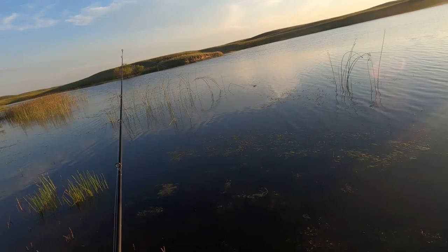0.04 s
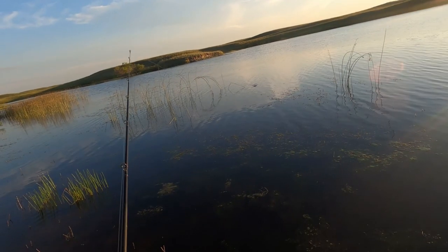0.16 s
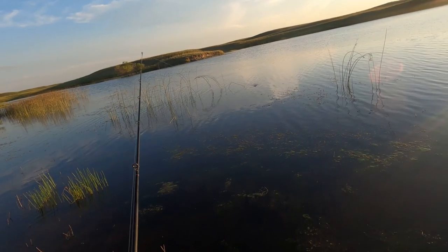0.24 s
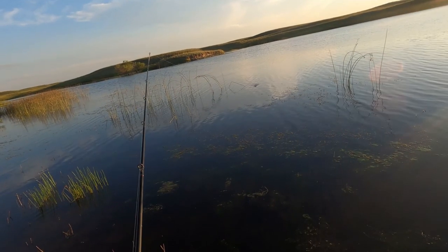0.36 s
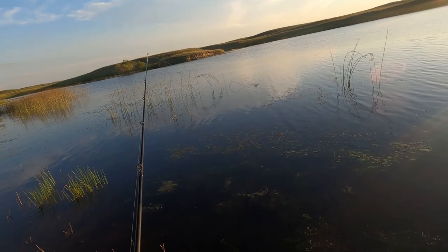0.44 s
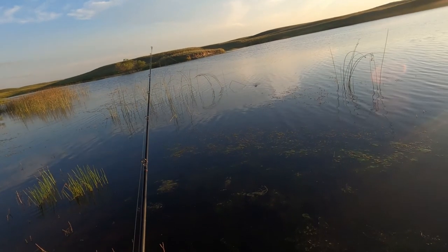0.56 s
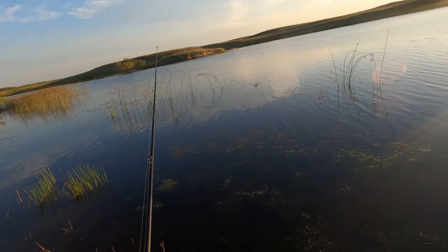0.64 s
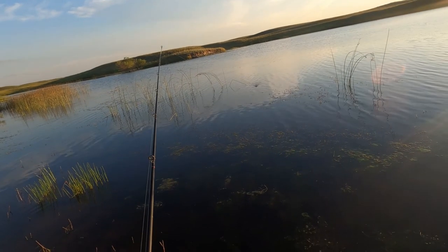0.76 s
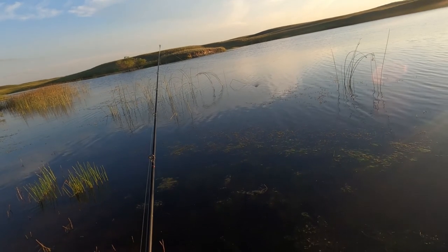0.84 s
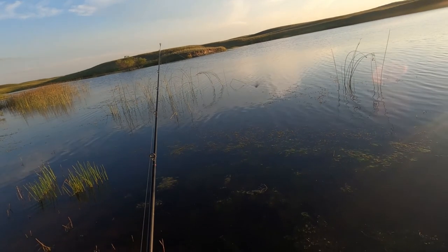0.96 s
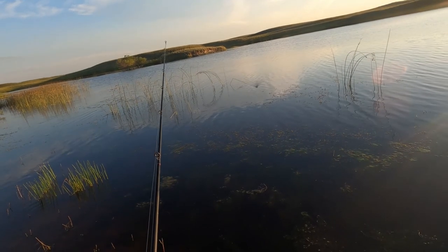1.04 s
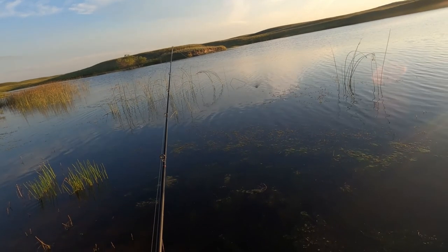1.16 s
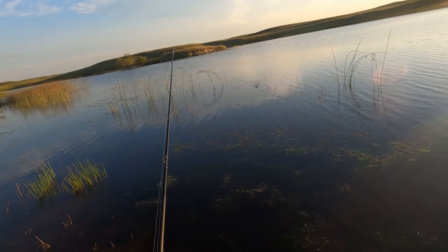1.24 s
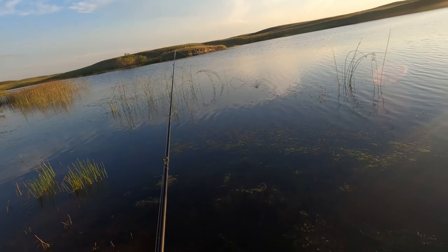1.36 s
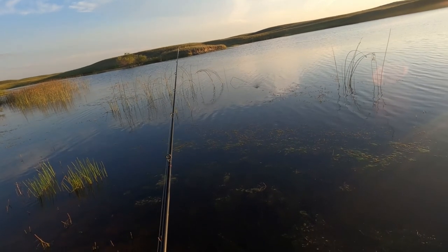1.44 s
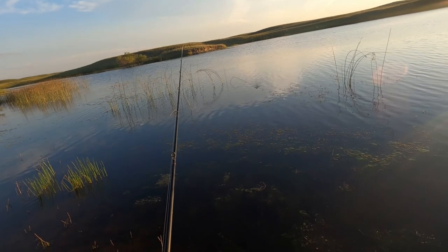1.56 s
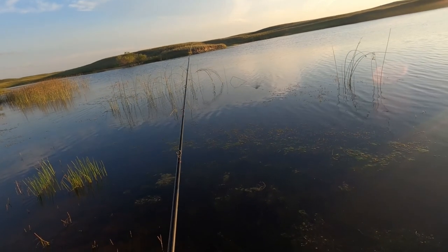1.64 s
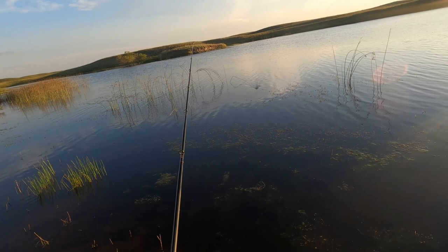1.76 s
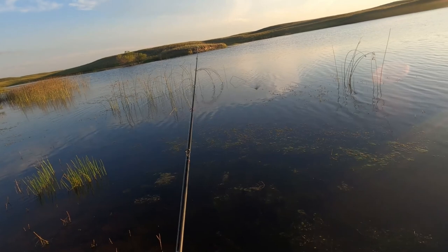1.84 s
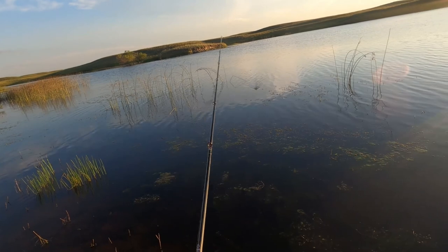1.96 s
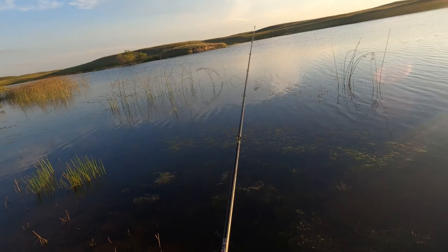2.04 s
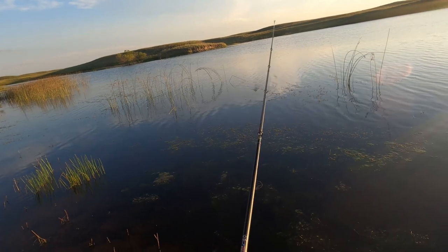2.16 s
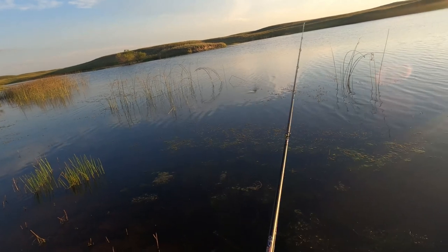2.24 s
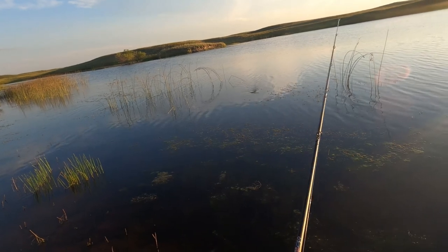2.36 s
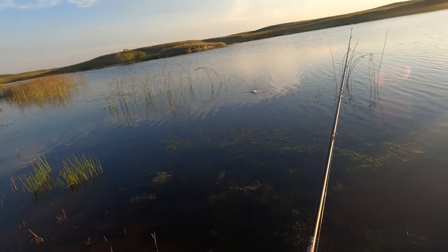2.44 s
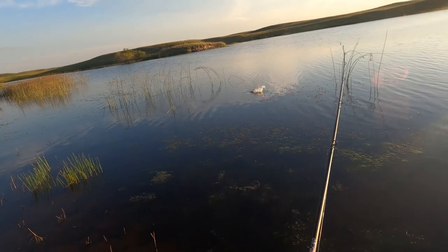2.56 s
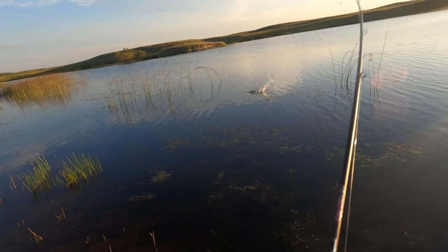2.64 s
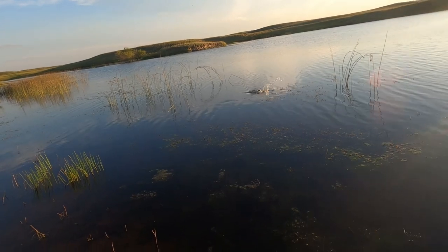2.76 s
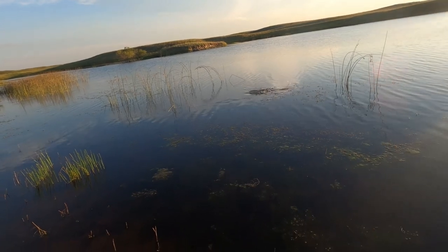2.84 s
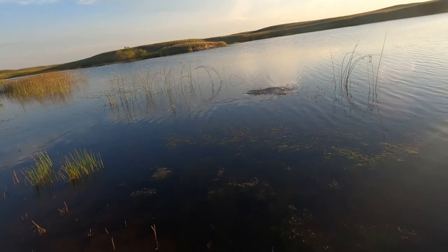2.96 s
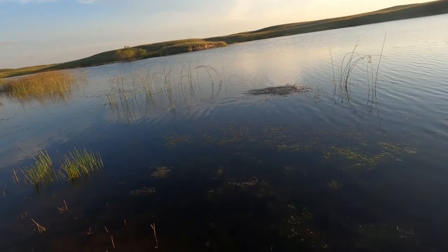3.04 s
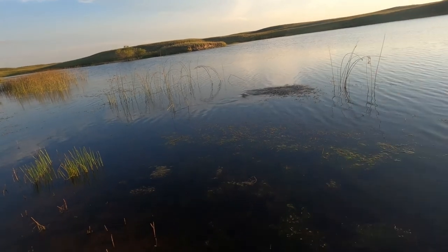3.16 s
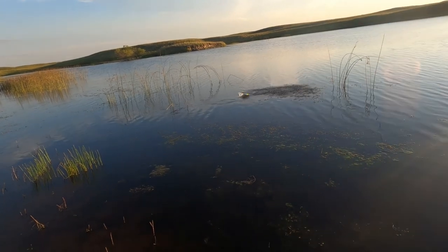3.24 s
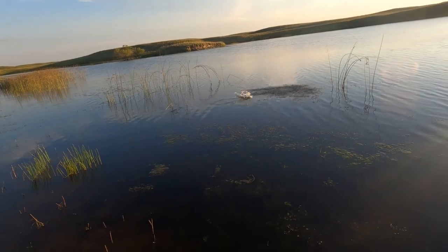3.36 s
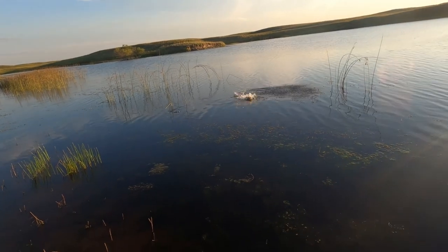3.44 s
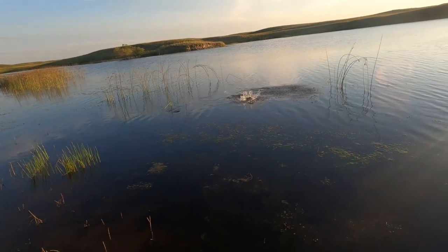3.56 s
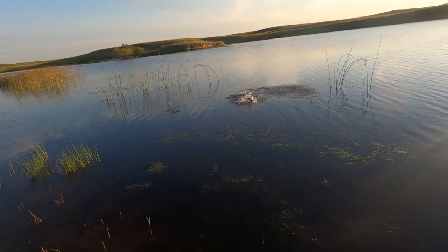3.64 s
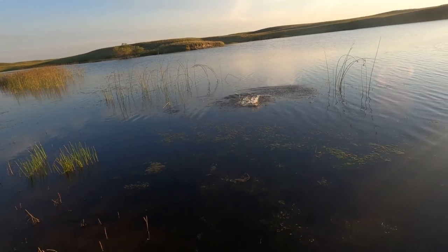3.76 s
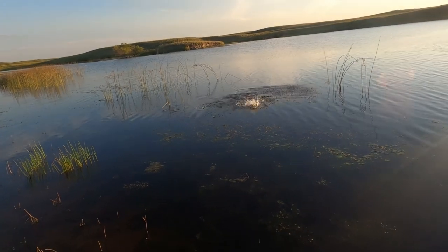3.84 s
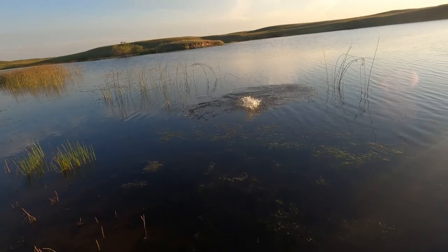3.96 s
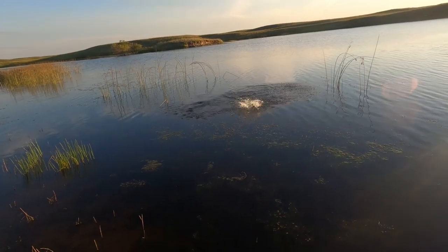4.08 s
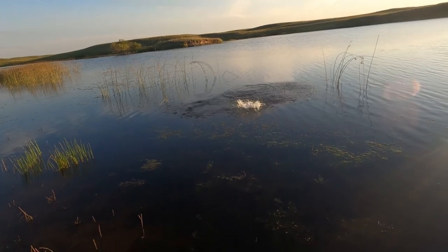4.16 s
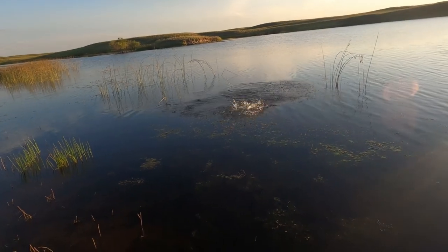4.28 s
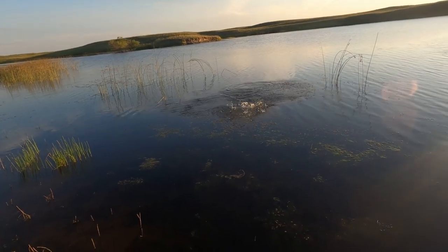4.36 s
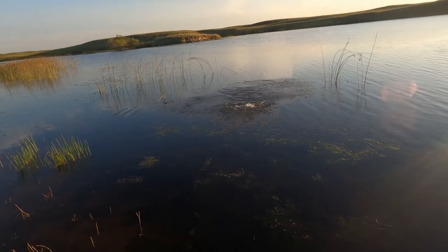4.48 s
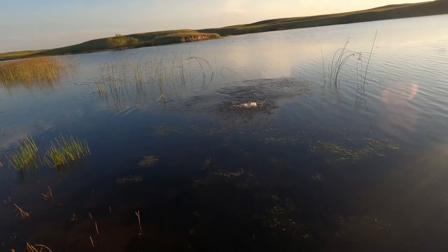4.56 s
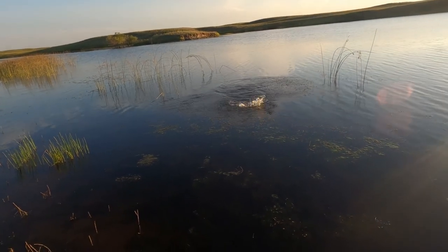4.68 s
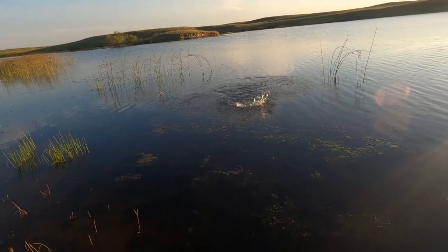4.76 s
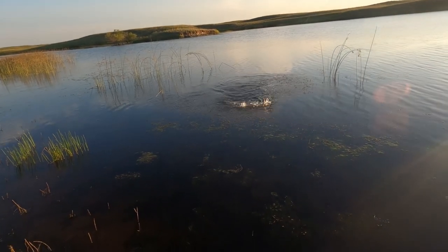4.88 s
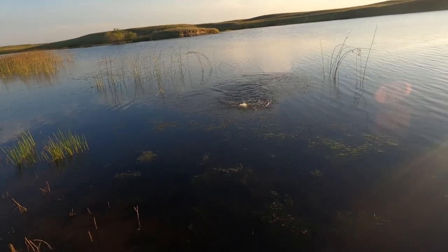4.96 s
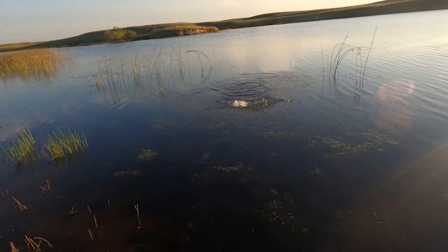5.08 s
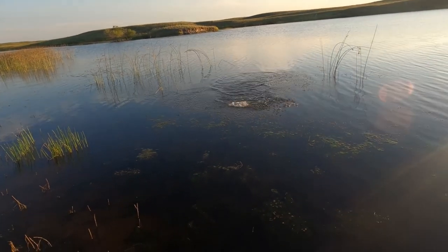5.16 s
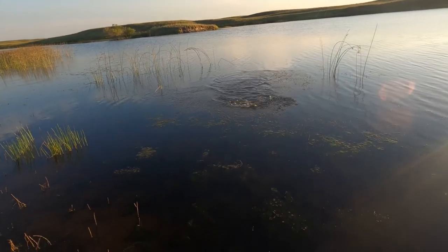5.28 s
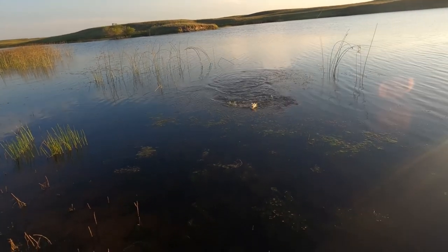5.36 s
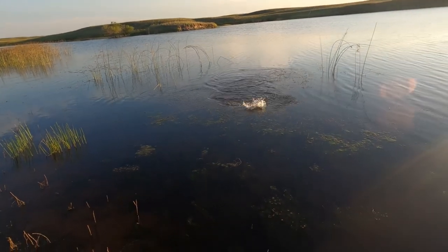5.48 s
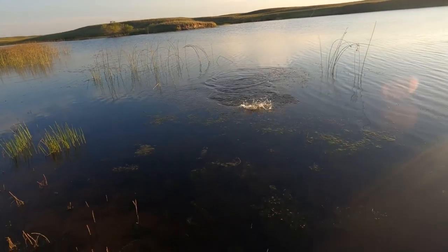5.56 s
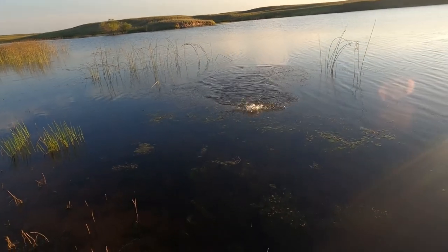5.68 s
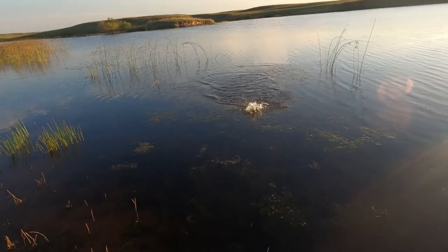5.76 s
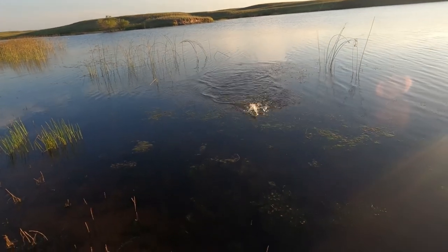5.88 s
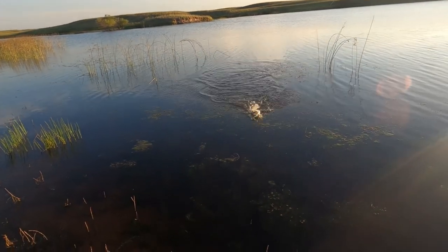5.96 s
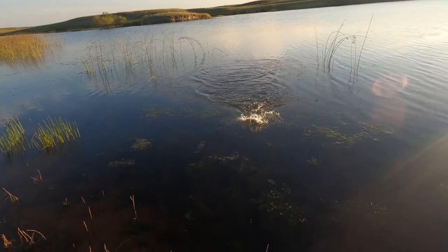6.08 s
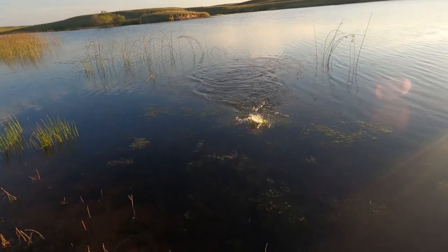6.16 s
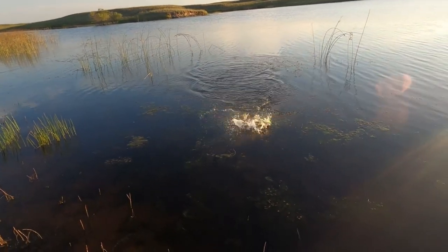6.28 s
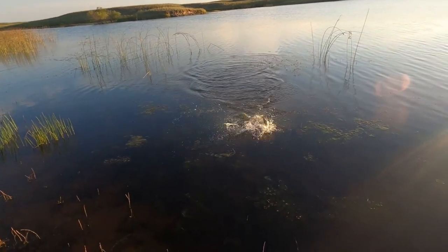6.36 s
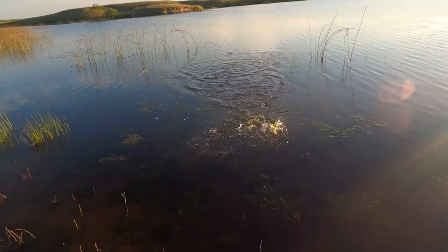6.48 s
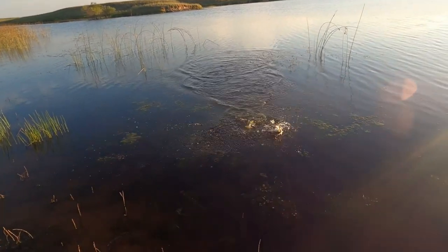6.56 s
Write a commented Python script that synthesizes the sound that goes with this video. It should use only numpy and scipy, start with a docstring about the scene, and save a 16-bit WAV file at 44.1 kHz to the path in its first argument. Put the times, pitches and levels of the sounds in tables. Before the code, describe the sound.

Crickets trill over a calm pond in a faint breeze, then a hooked fish bursts at the surface, slapping and splashing ever louder and closer.

```python
"""At a pond, a hooked fish thrashes at the surface, louder as it comes nearer; before the strike only small drips.
Slaps are decaying noise bursts, bubbles and gulps are gliding sines, and the churn is crowds of tiny bubbles
over filtered noise. Crickets and grasshoppers sing in the grass as pulsed tones with a gliding pitch.
A breeze buffets the two ports as low noise, and a far bed of air and insects is shaped noise."""
import sys
import numpy as np
from scipy import signal
from scipy.fft import rfft, irfft, next_fast_len
from scipy.io import wavfile
from scipy.ndimage import uniform_filter1d, map_coordinates

SR = 44100
rng = np.random.default_rng(int(sys.argv[2]) if len(sys.argv) > 2 else 0)


def wrap_up_sound(samples):
    """Save the sound to the file named by the first command line argument, as 16-bit audio."""
    columns = np.atleast_2d(samples).T
    # keep every value between -1 and 1, then stretch to whole-number steps
    tamed = np.clip(columns, -1, 1)
    steps = np.round(tamed * 32767).astype(np.int16)
    wavfile.write(sys.argv[1], SR, steps)


N = 291942  # length in samples

# Far air and insect chorus. Each row: frequency in Hz, gain in dB.
MARSH = [(65, -24), (110, -3.5), (223, -3), (285, -8.5), (479, -13), (1010, -16.5), (1270, -14),
         (2130, -18), (4060, -27), (5650, -17), (6810, -30), (8210, -11.5), (9890, -44), (15600, -46)]
# Likeness of the ports in the far bed. Each row: frequency in Hz, left-right correlation.
MARSH_ALIKE = [(180, 0.12), (1500, 0.32), (5000, 0.094), (8000, -0.11), (15000, 0.061)]
# Balance of the far bed. Each row: frequency in Hz, left over right in dB.
MARSH_LEAN = [(300, -6.0), (1300, -1.0), (8100, 3.5), (15000, -1.0)]
# A faint mid-pitched murmur. Each row: time in seconds, level in dB before its flicker.
MURMUR = [(0, -85), (.22, -70.5), (.45, -92), (.66, -77), (1, -102), (1.3, -73.5), (1.5, -71), (1.62, -94),
          (2.0, -78), (2.3, -95)]
# Wind at the ports. Each row: time in seconds, buffet in dB, left over right in dB, flutter in dB above buffet.
BREEZE = [(0, -70, 20, -25), (.16, -54, 14.5, -16), (.4, -36, -1, -13), (.58, -50, 2, -18),
          (.72, -41, 10, -6), (.95, -52, 15.5, -12), (1.33, -53, 1.5, -3), (1.9, -49.5, 11, -20),
          (2.4, -61.5, 7, -24), (2.81, -42, 2, -19.5), (3.51, -42.5, 7, -21), (3.72, -61, 5, -5.5),
          (4.05, -46, 6, -15), (4.36, -57, 3, -34), (4.9, -51.5, 2, -8), (5.38, -34, 6.5, -9.5),
          (5.65, -35.5, -2.5, -6.5), (6.03, -45, 11, -0.5), (6.25, -56.5, -6, -0.5)]
# Spectra of slow eddies and of faster flutter. Each row: frequency in Hz, gain in dB.
BUFFET, FLUTTER = [(8, -8.5), (30, 5), (50, -5.5), (110, -31), (200, -83)], [(35, -34), (60, 3), (110, -3.5), (190, -16.5), (400, -80)]
# Phrases of the near cricket. Each row: first stroke in seconds, strokes, gap in seconds, relative level in dB.
CRICKET = [(.094, 19, .0563, -57), (1.609, 12, .063, -62), (2.573, 7, .0553, -61), (3.034, 19, .0569, -56),
           (5.017, 6, .066, -60), (5.416, 12, .057, -57)]
WARM_UP_DB, WARM_UP_STROKES = 4, 2  # a phrase starts softer by this much, and recovers over so many strokes
# Steady far crickets. Each row: top pitch in Hz, mean strokes a second, mean level in dB.
FAR_CRICKETS = [(8270, 30, -62.5), (7660, 130, -71.5)]
# Rattle of a grasshopper. Each row: time in seconds, level in dB before panning.
BUZZ = [(.95, -88), (1.06, -76), (1.3, -71.5), (1.47, -72), (1.54, -93)]
TRILL_HZ, TRILL_RATE, TRILL_DB = 5730, 79, -84  # far trill: pitch, pulses a second, level before panning

# Single bubbles and drips. Each row: centre in seconds, pitch in Hz, relative peak in dB, time scale in ms.
BUBBLES = [(.106, 1027, -54, 2.9), (.111, 1764, -57.5, 1.4), (0.525, 1027, -57.5, 2.5),
           (.918, 1000, -52.5, 1.2), (0.926, 1750, -51.5, 2.6), (1.438, 1016, -55.5, 2.9),
           (2.072, 960, -58.5, 9), (2.344, 1005, -61.5, 3.2), (2.465, 1476, -32, 0.65),
           (2.464, 3810, -35, 0.68), (2.53, 930, -50, 2.3), (2.572, 1235, -30, 1.7),
           (2.597, 3464, -20.5, 0.3), (2.598, 998, -33.5, 2), (2.606, 1800, -33.5, 3.2),
           (2.629, 5100, -39, 1), (2.644, 954, -42, 6.8), (2.648, 1900, -45, 4.3), (2.66, 4500, -42.5, 2),
           (2.778, 5200, -42, 1.3), (2.779, 6020, -47, 1.8), (2.87, 1800, -44, 1.9),
           (2.66, 2870, -36.5, 2.9), (2.783, 1446, -39, 3.9), (2.826, 1277, -49, 13),
           (2.876, 946, -48.5, 10.7), (2.93, 1190, -49.5, 5.2), (2.976, 1360, -43, 0.86),
           (2.989, 4900, -33.5, 0.45), (3.008, 4530, -47, 0.76), (3.024, 2830, -40, 0.67),
           (3.047, 1117, -47, 1.8), (3.056, 2800, -45, 1.2), (3.071, 5870, -35.5, 0.5),
           (3.079, 4430, -37.5, 1.05), (3.105, 1730, -34.5, 1), (3.134, 1473, -36.5, 0.65),
           (3.15, 1860, -33, 1.4), (3.154, 2900, -34.5, 1.5), (3.288, 2900, -48.5, 0.66),
           (3.298, 5950, -45.5, 0.85), (3.314, 1160, -42, 1.7), (3.338, 311, -42.5, 8.5),
           (3.385, 899, -38, 1.8), (3.546, 3600, -37, 1.2), (3.58, 1102, -41.5, 2), (3.945, 1314, -34, 1.8),
           (3.487, 682, -31.5, 1.1), (3.604, 1064, -38.5, 2.6), (3.814, 1264, -28.5, 2.7),
           (3.867, 1435, -32, 2.5), (4.092, 1085, -28, 1.1), (4.099, 186, -40, 8.1),
           (4.113, 1100, -20.5, 1.85), (4.13, 388, -30, 3.8), (4.232, 625, -33, 1), (4.415, 2600, -38, 3.2),
           (4.371, 801, -28, 0.78), (4.727, 403, -33, 1.7), (4.785, 255, -44.5, 19),
           (4.791, 597, -34.5, 1.9), (4.829, 269.4, -42.5, 12), (4.825, 1120, -36.5, 3.4),
           (4.886, 1093, -35, 1), (4.982, 6500, -31, 0.5), (4.987, 1400, -30.5, 1.6),
           (5.013, 715, -36, 1.8), (5.043, 894, -33.5, 1.1), (5.118, 557, -41.5, 3),
           (5.199, 4370, -29.5, 0.47), (5.234, 406, -37, 2.6), (5.836, 997, -30.5, 2.7),
           (5.873, 454, -26.5, 2.1), (5.911, 1400, -36, 1), (5.921, 1200, -34.5, 1.8),
           (6.022, 1300, -33, 1.6), (6.17, 1253, -40.5, 8.2), (6.047, 1860, -27.5, 1.1),
           (6.19, 642, -42.5, 11), (6.25, 587, -31.5, 3), (6.279, 1036, -25.5, 1.5), (6.295, 1980, -27, 1),
           (6.388, 1243, -16.5, 1.2), (6.39, 4300, -24, 0.88), (6.557, 1400, -31, 1.5),
           (6.598, 2200, -32.5, 1.6)]
# Big air pockets that close. Each row: centre in seconds, pitch in Hz, relative peak in dB, time scale in ms.
GULPS = [(5.795, 331, -38, 12.7), (5.803, 1011, -36.5, 7.02), (5.828, 427, -37.5, 7.7)]
# Octaves a pitch can climb on each side of its centre, in churned water, in calm water and in a gulp
GLIDE, DRIP_GLIDE, GULP_GLIDE = 0.0951, 0.44, 0.91
# Spells of calm surface. Each row: start in seconds, end in seconds.
CALM = [(0, 2.45), (2.98, 3.316)]
# Thrashes of the fish. Each row: start in seconds, length in seconds, splash level in dB,
# gurgle in dB above splash, spray in dB above splash.
THRASHES = [(2.448, 0.11, -62, -11, 5), (2.569, 0.072, -47.5, -10, -10.5), (2.717, 0.081, -50, -11.5, -13),
            (2.836, 0.022, -58.5, -26, 1.5), (2.914, 0.029, -59, -27, 0.5), (3.01, 0.15, -66, -28, 9.5),
            (3.313, 0.039, -48, -5, -13), (3.364, 0.06, -45.5, -1, -22), (3.417, 0.049, -49.5, -0.5, 3),
            (3.504, 0.061, -51, -9, 2.5), (3.562, 0.15, -48.5, -16, 1), (3.761, 0.12, -52, -15, -0.5),
            (3.86, 0.048, -44, -21, -4.5), (3.914, 0.22, -46.5, -10, -5), (4.077, 0.17, -44.5, 1.5, -4.5),
            (4.272, 0.19, -43, -1.5, -5.5), (4.53, 0.14, -49.5, -8, -5), (4.703, 0.25, -48.5, 0, -4.5),
            (4.971, 0.17, -48, 0.5, -6), (5.174, 0.22, -50, -11.5, -6.5), (5.439, 0.11, -44.5, -3, -4),
            (5.619, 0.075, -47, -15, -7), (5.696, .13, -46, 1, -3), (5.887, 0.13, -49, -3.5, -1),
            (5.974, 0.15, -44, -24, -1.5), (6.163, 0.19, -45.5, -5.5, -2.5), (6.267, 0.026, -40.5, -4, 0.5),
            (6.337, 0.26, -41.5, -4.5, -3.5)]
RISE_S, SETTLE_DB_PER_S = 0.018, 129  # water boils up fast, then calms
DRIP_STOP_DB_PER_S = 400  # on a calm surface the patter stops short
PLINK_DB = -5.5  # sparse ringing bubbles, against the splash
# Filters for large bubbles, middling bubbles and fine spray. Each row: frequency in Hz, gain in dB.
GURGLE, SPLASH, SPRAY = [(100, -23), (170, -10.5), (280, -10), (450, -7), (800, 0.5), (1300, 4),
                         (2500, -67)], [(250, -75), (550, -12.5), (800, -12), (1200, -3.5), (1900, -4.5),
                                         (2400, -7.5), (3500, -5), (6000, -27), (12000, -92)], [(900, -41), (2200, -6), (3300, -7.5), (4300, -6.5),
                                                         (5500, -8.5), (7800, -10), (9200, -19.5),
                                                         (12600, -25), (15600, -43)]
# Tail slaps. Each row: time in seconds, relative crack level in dB, thud in dB above it (before a fixed
# 12.5 dB offset), time for the crack to fall 60 dB in seconds.
SLAPS = [(2.465, -25.5, -15, 0.053), (2.598, -30, -24, 0.027), (2.628, -33, -2, 0.012),
         (2.729, -45, 4.5, 0.012), (2.7516, -44.5, 7, 0.0094), (2.7776, -37.5, -7, 0.095),
         (3.332, -56, 18.5, 0.0069), (3.524, -34, -12, 0.11), (3.6941, -25.5, -16.5, 0.03),
         (3.845, -21.5, -46, 0.035), (3.854, -27.5, -47, 0.18), (4.0869, -27.5, -24, 0.082),
         (4.111, -38.5, 4.5, 0.062), (4.789, -45, -6, 0.013), (4.9583, -30, -39, 0.046),
         (5.4534, -29.5, -18, 0.051), (6.0426, -24.5, -18, 0.031), (6.1225, -14.5, -15, 0.011),
         (6.2777, -17, -16, 0.033), (6.3087, -32, -1.5, 0.037), (6.3877, -14.5, -19, 0.066),
         (6.4755, -22, -19, 0.043), (6.481, -21.5, -17, 0.03)]
# Likeness of the ports for water. Each row: frequency in Hz, left-right correlation.
WATER_ALIKE = [(300, .98), (2000, .94), (5000, .8), (14000, .3)]
# Balance of the water. Each row: frequency in Hz, left over right in dB.
WATER_LEAN = [(1300, -1.1), (2400, 0.5), (4400, -3), (8000, -3), (13000, -4.5)]
# Phase of the water. Each row: frequency in Hz, lag of the left port in radians.
WATER_LAG = [(300, 0.029), (2000, 0.54), (4000, 1.01), (15000, 3.13)]
TOP_HZ = 15760  # band limit

LEFT_RIGHT = np.array([[1], [-1]])  # opposite signs for the two ports


def amp(db):
    """Logarithmic level: decibels to amplitude gain."""
    return 10 ** (np.asarray(db) / 20)


def unit(x):
    """Normalisation: a signal scaled to rms 1."""
    return x / np.sqrt(np.mean(x ** 2) + 1e-20)


def along(points, hz):
    """Interpolation of (Hz, value) points on a logarithmic frequency axis."""
    f, v = np.transpose(points)
    return np.interp(np.log(hz + 1), np.log(f + 1), v)


def curves(rows):
    """Linear interpolation in time: one value per sample for each column after the time."""
    s, *cols = np.transpose(rows)
    return [np.interp(np.arange(N) / SR, s, c) for c in cols]


def wobble(rate):
    """Random modulation, slow or fast: a smooth curve through `rate` random knots a second."""
    knots = rng.standard_normal(int(N * rate / SR) + 4)
    return map_coordinates(knots, [np.arange(N) * rate / SR])


def filtered(x, response):
    """Linear filtering: the spectrum of x times a complex response of frequency."""
    m = next_fast_len(N + 8192)
    return irfft(rfft(x, m) * response(np.fft.rfftfreq(m, 1 / SR)), m)[..., :N]


def coloured(x, spectrum):
    """Spectral shaping: x through a table of gains, at rms 1."""
    return unit(filtered(x, lambda hz: amp(along(spectrum, hz))))


def pair(a, b, alike):
    """Partial coherence: two unrelated signals, mixed as sum and difference, give the tabled correlation."""
    def shares(hz):
        turn = np.arccos(np.clip(along(alike, hz), -1, 1)) / 2
        return np.array([np.cos(turn), np.sin(turn)])
    mid, side = filtered(np.array([a, b]), shares)
    return np.array([mid + side, mid - side])


def marsh():
    """Diffuse field: a far, slightly uneven bed of air and insects, in which a faint murmur comes and goes."""
    bed = pair(*coloured(rng.standard_normal((2, N)), MARSH), MARSH_ALIKE)
    bed = filtered(bed, lambda hz: amp(LEFT_RIGHT * along(MARSH_LEAN, hz) / 2))
    bed_gain = amp(-64.5 + 0.53 * wobble(3.57) + 1.35 * wobble(40))
    murmur = unit(filtered(rng.standard_normal(N), lambda hz: 1 / (1 + ((hz - 1230) / 150) ** 2)))
    murmur_gain = amp(curves(MURMUR)[0] + 2.5 * wobble(24.4))
    return bed_gain * bed + murmur_gain * murmur


def breeze():
    """Turbulent pressure: eddies buffet each port on its own, and a faster flutter rides on them."""
    buffet_db, lean_db, flutter_db = curves(BREEZE)
    level = buffet_db - 0.1 + np.array([lean_db, -lean_db]) / 2

    def lumps(rate, depth_db):
        return amp(depth_db * np.array([wobble(rate), wobble(rate)]))
    low = unit(lumps(8.1, 3.16) * coloured(rng.standard_normal((2, N)), BUFFET))
    fast = unit(lumps(13, 5.4) * coloured(rng.standard_normal((2, N)), FLUTTER))
    return amp(level) * (low + amp(flutter_db) * fast)


def rattle(hz, rate, sweep_hz):
    """Stridulation: fast leg strokes, each a short tone that falls in pitch."""
    cycle = (rate * np.arange(N) / SR) % 1 - .5
    gate = np.cos(np.pi * cycle) ** 4
    uneven = amp(1.5 * wobble(40))
    phase = 2 * np.pi * np.cumsum(hz - sweep_hz * cycle) / SR + .6 * wobble(700)
    return unit(gate * uneven * np.sin(phase))


def grasshoppers():
    """Pulsed tones: one short rattle, mostly left, and a far central trill that keeps on."""
    near = amp(curves(BUZZ)[0]) * rattle(5080, 83, sweep_hz=1230)
    far = amp(TRILL_DB + 2.1 * wobble(2.7)) * rattle(TRILL_HZ, TRILL_RATE, sweep_hz=890)
    return near * [[1.1], [.3]] + far * [[.8], [.8]]


def stroke(top_hz):
    """Frequency modulation: in one wing stroke the pitch arches up, then drops further as the tone dies."""
    t = np.arange(-.016, .016, 1 / SR)
    pitch = top_hz - np.where(t < 0, 2.4e6, 4.5e6) * t ** 2
    envelope = np.exp(-(t / np.where(t < 0, .009, .01)) ** 4)
    return envelope * np.sin(2 * np.pi * np.cumsum(pitch) / SR)


def crickets():
    """Stroke trains, louder on the left: the near cricket sings in phrases, far ones keep on with uneven level."""
    beats = np.zeros(N)
    for s, strokes, gap_s, db in CRICKET:
        k = np.arange(strokes)
        soft_db = WARM_UP_DB * np.exp(-k / WARM_UP_STROKES)
        at = np.round((s + k * gap_s) * SR).astype(int)
        beats[at] = amp(db - soft_db + rng.normal(0, 1.8, strokes))
    song = amp(4.0) * signal.fftconvolve(beats, stroke(7950), "same") * amp(0.85 * wobble(400))
    for top_hz, rate, db in FAR_CRICKETS:
        strokes_so_far = np.cumsum(rate * (1 + 0.031 * wobble(1.1))) / SR
        beats = np.diff(np.floor(strokes_so_far), prepend=0)
        far = signal.fftconvolve(beats * amp(db + 3 * wobble(4)), stroke(top_hz), "same")
        song += far * amp(3 * wobble(500))
    return song * [[1], [-.4]]


def calm(s):
    """Surface state: whether the water lies calm at these times."""
    return sum((a < s) & (s < b) for a, b in CALM)


def blips(s, hz, db, half_ms, glide, size):
    """Damped oscillation: short tones that swell fast, die slower and glide up in pitch."""
    t = (np.arange(size) - size // 3) / SR
    u = t / (half_ms[:, None] / 1000)
    shape = np.exp(-np.where(u < 0, u ** 2, (.7 * np.abs(u)) ** 1.4)) * signal.windows.tukey(size, .4)
    pitch = hz[:, None] * 2 ** (glide[:, None] * np.tanh(u / 2.98))
    tone = amp(db)[:, None] * shape * np.sin(2 * np.pi * np.cumsum(pitch, axis=1) / SR)
    at = np.round(s * SR).astype(int)[:, None] + np.arange(size) - size // 3
    return np.bincount(np.clip(at, 0, N).ravel(), tone.ravel(), N + 1)[:N]


def foam(count, centre_hz, octaves, cycles, spread_db, size):
    """Superposition: a crowd of small bubbles at random times, pitches and strengths."""
    draw = rng.random((count, 3))
    hz = np.clip(centre_hz * 2 ** (octaves * rng.standard_normal(count)), 120, 15000)
    db = -spread_db * np.log(1.01 - draw[:, 1])  # many weak ones, a few strong
    half_ms = 1000 * cycles * (.5 + draw[:, 2]) / hz
    return unit(blips(draw[:, 0] * N / SR, hz, db, half_ms, np.full(count, .25), size))


def thrashing():
    """Addition of powers: each thrash rises, holds and settles; returns gains of splash, gurgle and spray."""
    start, length, splash_db, gurgle_db, spray_db = np.transpose(THRASHES)
    settle = np.where(calm(start), DRIP_STOP_DB_PER_S, SETTLE_DB_PER_S)
    t = np.arange(0, N + 64, 64) / SR - start[:, None]  # one step per 64 samples
    fall_db = settle[:, None] * np.clip(t - length[:, None], 0, None)
    power = np.clip(t / RISE_S, 0, 1) ** 2 * amp(-2 * fall_db)
    levels_db = np.array([splash_db, splash_db + gurgle_db, splash_db + spray_db])
    gains = np.sqrt(amp(2 * levels_db) @ power)
    return [np.interp(np.arange(N) / 64, np.arange(len(g)), g) for g in gains]


def churn():
    """Bubble noise: three sizes on rushing water, with ticking drops; froth makes the main layers heave together."""
    splash_gain, gurgle_gain, spray_gain = thrashing()
    heave = .7 * wobble(25) + .6 * wobble(11)

    def hiss(share):
        return share * rng.standard_normal(N)
    large = foam(count=1800, centre_hz=449.8, octaves=0.665, cycles=2.6, spread_db=2, size=900)
    gurgle = coloured(large + hiss(1.1), GURGLE)
    middling = foam(count=4200, centre_hz=1399, octaves=0.761, cycles=2.18, spread_db=1.84, size=420)
    splash = coloured(middling + hiss(1.0), SPLASH)
    drops = foam(count=700, centre_hz=4550, octaves=0.77, cycles=0.33, spread_db=2.5, size=60)
    fine = foam(count=9000, centre_hz=6130, octaves=0.817, cycles=1.6, spread_db=1.5, size=140)
    spray = coloured(fine + 0.36 * drops + hiss(1.0), SPRAY)
    ringing = foam(count=800, centre_hz=1300, octaves=1.1, cycles=6.5, spread_db=1.8, size=900)
    plinks = coloured(ringing, SPLASH)
    return (amp(PLINK_DB) * splash_gain * plinks
            + gurgle_gain * unit(amp(1.6 * heave) * gurgle)
            + splash_gain * unit(amp(1.2 * heave) * splash)
            + spray_gain * unit(amp(0.63 * heave + .8 * wobble(110)) * spray))


def bubbles():
    """Bubble resonance: pitch climbs little in churned water, more for drips on calm water, most for gulps."""
    s, *rest = np.transpose(BUBBLES)
    glide = np.where(calm(s), DRIP_GLIDE, GLIDE)
    tones = blips(s, *rest, glide, size=4000)
    tones += blips(*np.transpose(GULPS), np.full(len(GULPS), GULP_GLIDE), size=4000)
    return tones * amp(1.5 * wobble(300) + 2 * wobble(1500))  # the trembling surface roughens them


def slaps():
    """Impact: each slap is a burst of ragged cracks; the thud of displaced water lasts longer."""
    crack, thud, t = np.zeros(N + SR), np.zeros(N + SR), np.arange(SR // 8) / SR
    rise = 1 - np.exp(-t / .0003)
    snap = 1 + 2 * np.exp(-t / 0.001)  # the first contact is the sharpest
    for s, db, thud_db, t60 in SLAPS:
        noise = rng.standard_normal((3, len(t)))
        ragged = amp(2.5 * unit(uniform_filter1d(noise[2], size=30)))
        at = slice(round(s * SR), round(s * SR) + len(t))
        crack[at] += amp(db - 3.5 - 60 * t / t60) * rise * snap * ragged * noise[0]
        thud[at] += amp(db + thud_db + 12.5 - 60 * t / (1.45 * t60)) * rise * noise[1]
    bright = signal.butter(1, [1700, 5500], "bandpass", fs=SR)
    dull = signal.butter(1, [250, 1500], "bandpass", fs=SR)
    fade = signal.butter(2, 7000, fs=SR)
    both = signal.lfilter(*bright, crack[:N]) + signal.lfilter(*dull, thud[:N])
    return signal.lfilter(*fade, both)


def water():
    """Interaural cues: the fish is a little to the right, heard there first; ripple scattering loosens the treble."""
    near = slaps() + bubbles() + churn()
    cells = signal.stft(near, nperseg=128)[2]
    random_phase = np.exp(2j * np.pi * rng.random(cells.shape))
    scattered = signal.istft(cells * random_phase, nperseg=128)[1][:N]
    both = pair(near, unit(scattered) * near.std(), WATER_ALIKE)

    def placing(hz):
        lean = amp(LEFT_RIGHT * along(WATER_LEAN, hz) / 2)
        return lean * np.exp(-.5j * LEFT_RIGHT * along(WATER_LAG, hz))
    return filtered(both, placing)


def scene():
    """Superposition of marsh, wind, insects and water."""
    return marsh() + breeze() + grasshoppers() + crickets() + water()


def record(dry):
    """Band limiting: nothing above the limit is kept."""
    return filtered(dry, lambda hz: hz < TOP_HZ)


dry = scene()
out = record(dry)
wrap_up_sound(out)
```